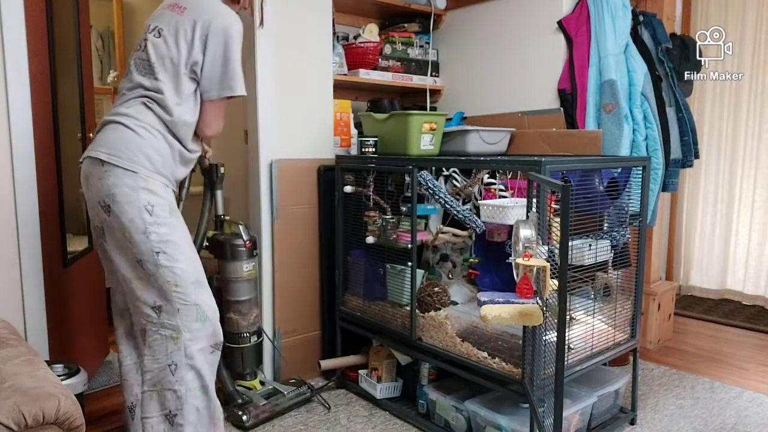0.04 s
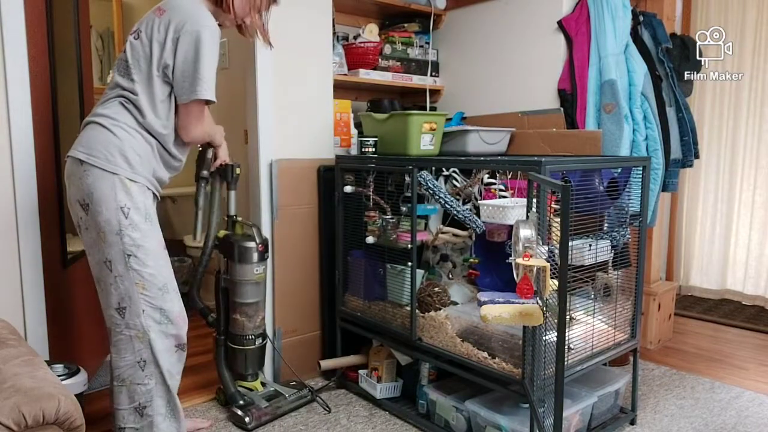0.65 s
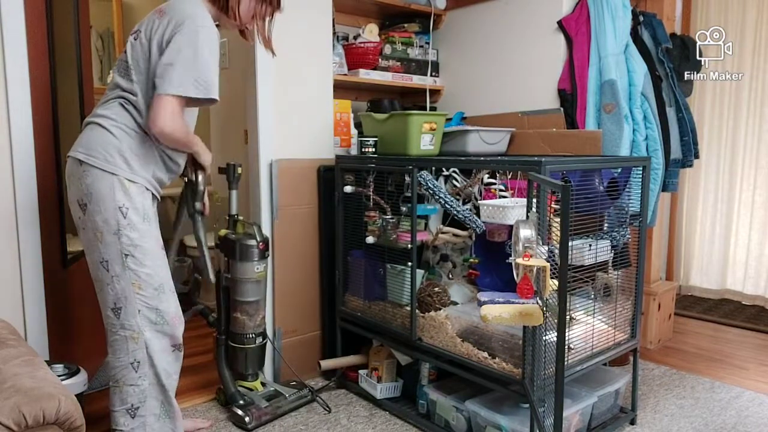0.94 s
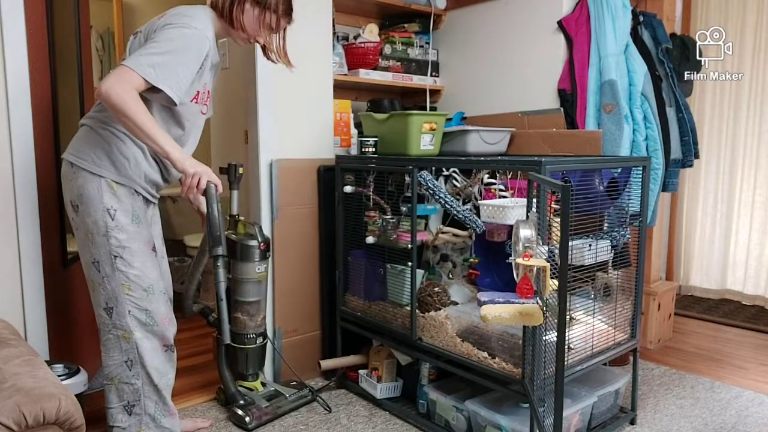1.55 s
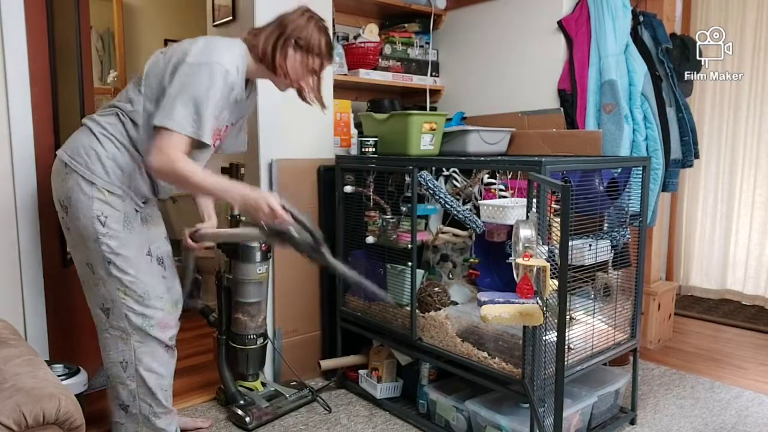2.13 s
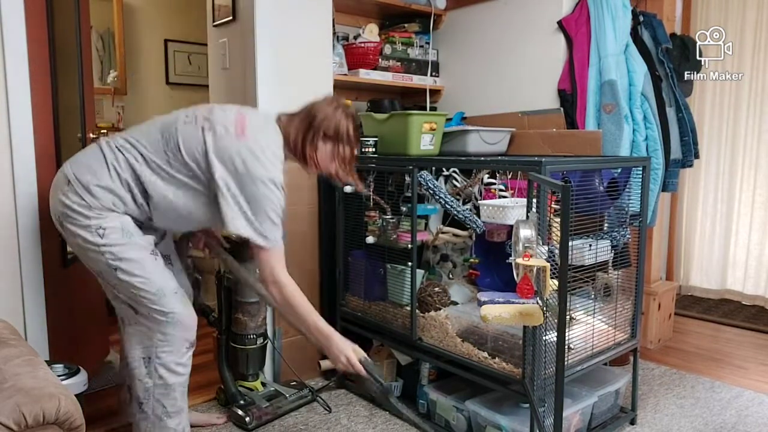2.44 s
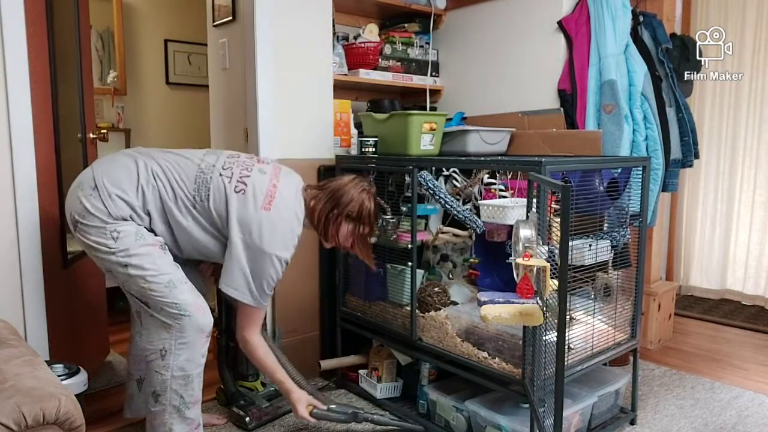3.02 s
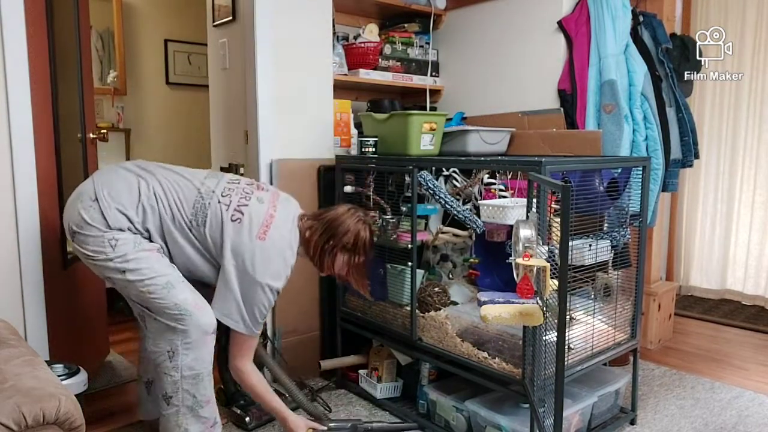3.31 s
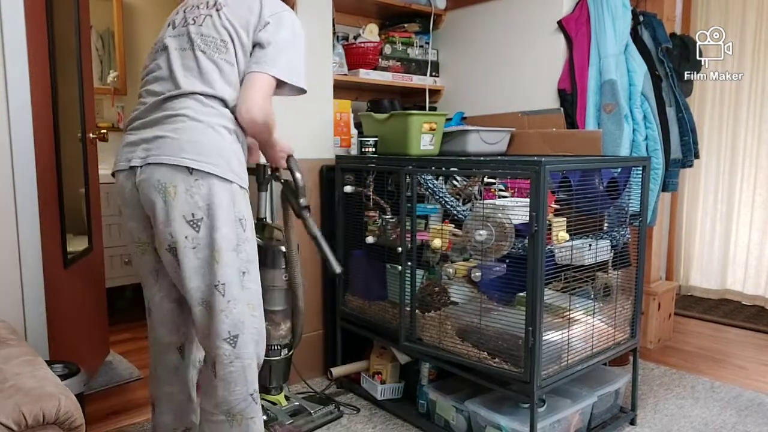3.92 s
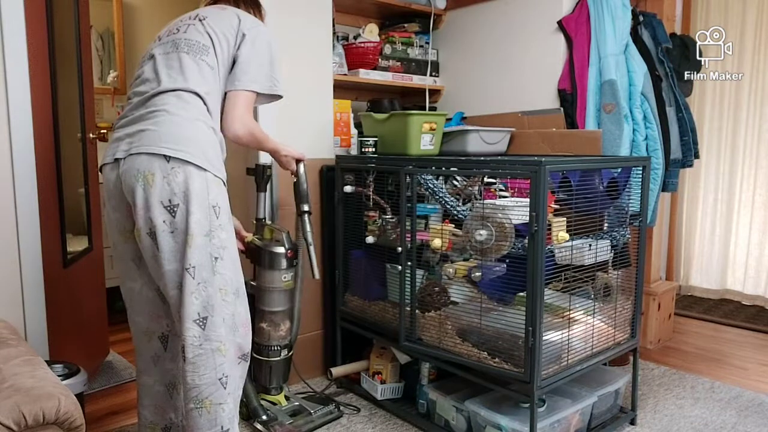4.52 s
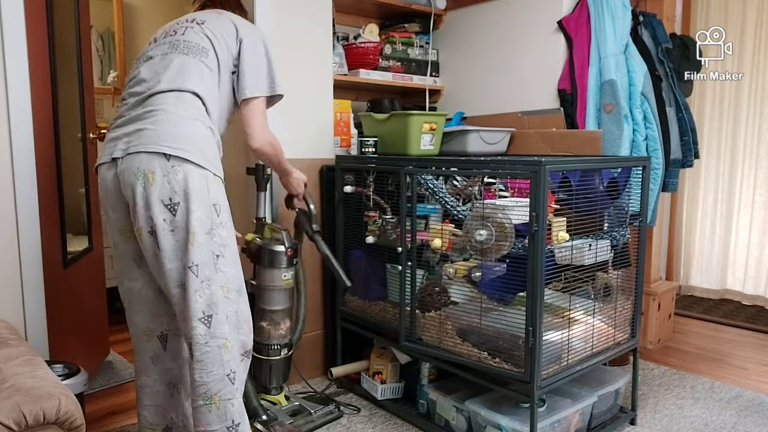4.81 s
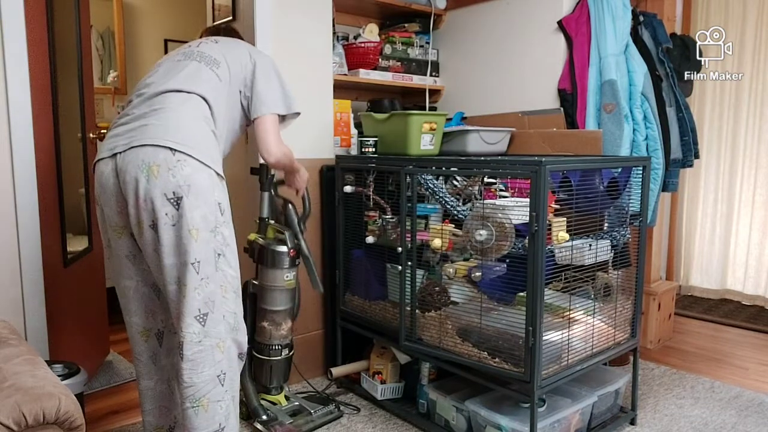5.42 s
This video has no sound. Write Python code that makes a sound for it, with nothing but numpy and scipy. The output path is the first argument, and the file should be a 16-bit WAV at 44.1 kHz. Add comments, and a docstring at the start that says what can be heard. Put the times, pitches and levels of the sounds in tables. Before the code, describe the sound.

After some light plastic clatter, an upright vacuum cleaner starts, runs briefly with a whine and rushing air, then coasts down indoors.

```python
"""A living room, where someone uses an upright vacuum cleaner. Its wand (the plastic tube) is pulled
from its clips with a few knocks, and the switch snaps. The motor squeaks, hums and spins up to a
loud whine while its fan drives rushing air. The nozzle works along the floor, then draws free air:
the motor speeds up a little and the hiss brightens. Near the end the power is cut, the whine sinks
as the motor coasts down, and a few soft bumps come through the floor."""
import sys
import numpy as np
from scipy import signal
from scipy.io import wavfile

SR = 44100
rng = np.random.default_rng(int(sys.argv[2]) if len(sys.argv) > 2 else 0)


def store_pcm(level_fs):
    """Save levels as 16-bit WAV."""
    pcm = np.round(np.clip(level_fs, -1, 1) * 32767).astype(np.int16)
    wavfile.write(sys.argv[1], SR, np.atleast_2d(pcm).T)


N = 245002
TIME = np.arange(N) / SR
POWER_ON_S, NOZZLE_FREE_S, POWER_OFF_S = 1.625, 3.72, 4.78
WORKING_HZ = 699   # motor turns per second with the nozzle on the floor


def from_db(db):
    """Turn decibels into a number to multiply a sound by."""
    return 10 ** (np.asarray(db) / 20)


def rms_one(x):
    """Scale a sound so that its average strength (rms) is 1."""
    return x / np.sqrt(np.mean(x ** 2) + 1e-20)


def at_hz(points, hz):
    """Read between the rows of a (frequency, value) table, giving each octave equal room."""
    frequencies, values = np.array(points).T
    return np.interp(np.log(hz), np.log(frequencies), values)


def after(s, ramp):
    """A smooth step from 0 to 1 at time s."""
    return .5 + .5 * np.tanh((TIME - s) / ramp)


def swell(s, spread):
    """A bell-shaped rise and fall around time s."""
    return np.exp(-((TIME - s) / spread) ** 2)


def panned(db):
    """Left and right gains that make the left louder by db and keep the total power."""
    gains = from_db(np.array([[.5], [-.5]]) * db)
    return gains / np.sqrt(np.mean(gains ** 2, axis=0))


def drift(rate):
    """A smooth random wobble of about size 1; a higher rate (Hz) makes it quicker."""
    step, warm_up = 40, 2000
    r = np.exp(-2 * np.pi * rate * step / SR)
    noise = rng.standard_normal(N // step + warm_up + 2)
    slow = signal.lfilter([1], [1, -2 * r, r * r], noise)[warm_up:]
    return np.interp(np.arange(N) / step, np.arange(len(slow)), rms_one(slow))


def resonate(x, hz, width):
    """Keep the part of a sound near hz; the narrower the width, the longer it rings."""
    r = np.exp(-np.pi * width / SR)
    feedback = [1, -2 * r * np.cos(2 * np.pi * hz / SR), r * r]
    return signal.lfilter(np.array([1, 0, -1]) * (1 - r * r) / 2, feedback, x + 1e-18)


def keep_side(x, hz, side):
    """A gentle filter that keeps the "low" or the "high" side of hz."""
    return signal.sosfilt(signal.butter(2, hz, side, fs=SR, output="sos"), x + 1e-18)


def wavering_tone(turns, waver, rate):
    """A tone whose echoes shift its level and phase at each ear as things move."""
    echo = np.array([1 + waver * (drift(rate) + 1j * drift(rate)) for ear in range(2)])
    return rms_one(np.real(echo * np.exp(2j * np.pi * turns)))


def strike(s, rise_s, fade_s):
    """A burst of tiny contacts that builds up, then dies away by 60 dB in fade_s."""
    age = np.maximum(TIME - s, 0)
    fade = from_db(-60 * np.maximum(age - rise_s, 0) / fade_s)
    return rng.standard_normal(N) * np.minimum(age / rise_s, 1) * fade


def room_echo(x, fade_s, echo_db):
    """The direct sound plus the room's fading wash of echoes, different at each ear."""
    t = TIME[:SR // 2]
    tail = keep_side(rng.standard_normal((2, len(t))), 7700, "low")
    tail *= from_db(-60 * t / fade_s) * (t > .003)
    tail /= np.sqrt(np.sum(tail ** 2, axis=1, keepdims=True))
    return x + from_db(echo_db) * signal.fftconvolve(np.atleast_2d(x), tail, axes=1)[:, :N]


def wall_echoes(x, longest_s, echo_db, count=12):
    """Nearby walls and furniture send a few quick echoes to each ear."""
    lags = rng.uniform(.0006, longest_s, (2, count))
    signs = rng.choice([-1, 1], (2, count))
    echoes = [sum(sign * np.roll(x[ear], int(lag * SR)) for lag, sign in zip(lags[ear], signs[ear]))
              for ear in range(2)]
    return x + from_db(echo_db) * np.array(echoes) / np.sqrt(count)


# How alike the noise is at the two ears: f/Hz, likeness (1 or more means the same)
EAR_LIKENESS = [(60, 0.5), (150, 0.6), (300, 1.05), (600, .5), (1200, 0.29), (3000, 0.1), (15000, 0.13)]
# Which way the noise leans: f/Hz, left minus right/dB
EAR_BALANCE = [(60, 1.3), (150, 2.6), (400, -.5), (1100, -1), (2400, .8), (4400, -.8), (8500, 4.2),
               (12000, .8)]
def noise_bands():
    """Stereo noise in third-octave slices, alike at both ears in the bass and unlike in the treble."""
    edges = 28 * 2 ** (np.arange(29) / 3)
    white = rng.standard_normal((2, 2, N))
    for k, (low, high) in enumerate(zip(edges, edges[1:])):
        band_filter = signal.butter(3, [low, high], "band", fs=SR, output="sos")
        shared, opposed = signal.sosfilt(band_filter, white[k % 2])
        hz = np.sqrt(low * high)
        alike = np.clip(at_hz(EAR_LIKENESS, hz), -1, 1)
        band = np.sqrt(1 + alike) * shared + np.sqrt(1 - alike) * opposed * [[1], [-1]]
        yield hz, band * panned(at_hz(EAR_BALANCE, hz))


# Tone colour of the quiet room: f/Hz, relative level/dB
ROOM_COLOUR = [(30, 1), (60, -5), (110, -7), (330, -4.5), (600, -19.5), (1800, -30), (3100, -34),
               (6500, -31.5), (11300, -26.5), (15500, -30)]
# Low drones: f/Hz, width/Hz, level/dB, loudest at t/s, spread/s
ROOM_DRONES = [(87.4, 52, -62.5, 0.045, 0.72), (163, 7.8, -72, 1.37, 0.53), (303.3, 23, -70.5, 0.45, 1.5)]
def room_tone():
    """Faint background noise with a few low drones that come and go."""
    out = from_db(-66) * rms_one(sum(from_db(at_hz(ROOM_COLOUR, hz)) * band for hz, band in noise_bands()))
    for hz, width, level_db, s, spread in ROOM_DRONES:
        noise = rng.standard_normal(N + SR)
        drone = resonate(resonate(noise, hz, width), hz, width)[SR:]
        out += from_db(level_db) * swell(s, spread) * rms_one(drone)
    return out


# Soft bumps on the floor: t/s, level/dB, f/Hz, length/s
FLOOR_BUMPS = [(2.703, -56, 60, 0.029), (5.07, -61, 58, .03), (5.412, -53.5, 202, .011),
               (5.436, -53, 125, .014), (5.447, -41.5, 65.6, .026)]
def floor_bumps():
    """Dull thuds come through the floor, sinking in pitch as they fade."""
    out = 0
    for s, level_db, hz, length in FLOOR_BUMPS:
        age = np.clip((TIME - s) / length, -6, 6)
        turns = hz * length * (age - .053 * age ** 2)
        out += from_db(level_db) * np.exp(-age ** 2 / 2) * wavering_tone(turns, waver=.04, rate=49)
    return out


# Knocks of wand, clips and switch, at relative levels: t/s, hollow/dB, clack/dB, crack/dB, fade/s
PLASTIC_KNOCKS = [(0.285, -69.5, -96, -87, 0.076), (0.421, -53.5, -54, -50, 0.11),
                  (0.429, -51, -64, -52, 0.077), (0.561, -53, -61, -57, 0.14),
                  (0.606, -51.5, -48, -67, 0.037), (0.647, -59.5, -55.5, -81, 0.055),
                  (0.751, -50, -43, -38, 0.042), (0.808, -65, -59, -56, 0.058),
                  (1.231, -64.5, -60, -44.5, 0.14), (1.26, -63, -53, -75, 0.073),
                  (1.523, -70, -68, -67, 0.14), (1.613, -55, -52.5, -42, 0.08),
                  (1.63, -47, -49, -36.5, 0.14), (1.837, -42, -44, -60, 0.063)]
# Short slides of wand and hose: t/s, relative level/dB, spread/s
WAND_SLIDES = [(0.01, -57.5, 0.022), (0.13, -69, 0.066), (0.385, -72, 0.027), (0.418, -57, 0.0047),
               (0.47, -73, .05), (0.6, -59, 0.02), (0.725, -54.5, 0.046), (0.81, -64, 0.1),
               (1.08, -74, 0.024), (1.28, -67, 0.054), (1.6, -68, 0.045)]
# Pitches at which the wand rings: f/Hz, width/Hz, gain/dB
WAND_RINGS = [(405, 147, 2), (824, 280, 4), (1180, 230, 5), (2176, 430, 1), (3930, 830, -3),
              (4600, 1600, -8)]
def wand_handling():
    """Knocks and scrapes make the tube ring, low (hollow) and high (clack), with a bright crack."""
    hollow, clack, crack = np.zeros((3, N))
    for s, hollow_db, clack_db, crack_db, fade_s in PLASTIC_KNOCKS:
        rattle = strike(s, rise_s=.0021, fade_s=fade_s)
        hollow += from_db(hollow_db + 13.5) * rattle
        clack += from_db(clack_db + 11.5) * rattle
        crack += from_db(crack_db - 2.5) * rattle
    strokes = sum(from_db(level_db) * swell(s, spread) for s, level_db, spread in WAND_SLIDES)
    scrape = strokes * from_db(4.3 * drift(44)) * rng.standard_normal(N)
    hollow += from_db(.5) * scrape
    clack += from_db(3) * scrape
    crack += from_db(-5) * scrape
    ring = sum((-1) ** k * from_db(db) * resonate(hollow if hz < 1800 else clack, hz, width)
               for k, (hz, width, db) in enumerate(WAND_RINGS))
    crack = keep_side(keep_side(crack, 8800, "high"), 12000, "low")
    return room_echo(ring + crack, fade_s=.14, echo_db=-1)


# Rings of the switch and squeaks of the brushes as the motor starts: t/s, relative level/dB, f/Hz, width/Hz,
# fade/s
SWITCH_AND_BRUSH_RINGS = [(1.633, -52, 12300, 700, 0.17), (1.644, -52, 2570, 300, 0.097),
                          (1.717, -56, 11380, 400, 0.11)]
def switch_and_brush_rings():
    """The switch rings as it snaps on, and the brushes, the motor's sliding contacts, chirp on the first turns."""
    out = 0
    for s, level_db, hz, width, fade_s in SWITCH_AND_BRUSH_RINGS:
        rub = strike(s, rise_s=.0018, fade_s=fade_s)
        band_gain = np.sqrt(SR / width)   # makes up for the narrow band
        out += from_db(level_db) * band_gain * resonate(resonate(rub, hz, width), hz, width)
    return room_echo(out, fade_s=.25, echo_db=4)


# Tones of the electric hum: f/Hz, relative level/dB
HUM_TONES = [(60, -76), (120, -51.5), (240, -55.5), (360, -52.5), (480, -70)]
def mains_hum(free):
    """The motor's coils hum unevenly while powered, hardest in the first surge of current."""
    powered = after(POWER_ON_S + .01, .022) - after(POWER_OFF_S, .02)
    surge = 1 - after(1.75, .03)
    hum = sum(from_db(db) * wavering_tone(hz * TIME, waver=.5, rate=6) for hz, db in HUM_TONES)
    return powered * from_db(6 * surge - 7 * free - 3.5) * hum * panned(2)


def motor_speed(free):
    """Turns per second: a kick from the current, a slower climb, then coasting against drag."""
    kick_share, kick_s, climb_s = .385, .074, .345
    running = np.maximum(TIME - POWER_ON_S, .005)
    shortfall = kick_share * np.exp(-running / kick_s) + (1 - kick_share) * np.exp(-running / climb_s)
    # as the nozzle comes free the speed jumps, then settles a little above the working speed
    jump_hz, settled_hz, settle_s = 14.5, 6, .42
    settling = np.exp(-np.maximum(TIME - NOZZLE_FREE_S, 0) / settle_s)
    hz = WORKING_HZ * (1 - shortfall) + free * (settled_hz + (jump_hz - settled_hz) * settling)
    coast_s, coast_power = 2.434, 1.561
    return hz / (1 + np.maximum(TIME - POWER_OFF_S, 0) / coast_s) ** coast_power


def driven_db(speed, free, floor_db, free_db, steepness):
    """A level that depends on where the nozzle is and grows as speed raised to the steepness."""
    return (1 - free) * floor_db + free * free_db + steepness * 20 * np.log10(speed / WORKING_HZ)


# Tone colour of the air, with the nozzle on the floor and with it free: f/Hz, relative level/dB
FLOOR_AIR_COLOUR = [(35, -17), (60, 0), (90, -19), (200, -2), (400, -3.5), (750, -2), (1050, -1.5),
                    (1700, 1.5), (3000, 0.5), (4100, 0), (5500, -1), (7800, -2.5), (10000, 0), (15500, -7)]
FREE_AIR_COLOUR = [(35, -18), (60, -1), (90, -15), (200, -1.5), (400, -1.5), (750, -3), (1050, 0),
                   (1700, -0.5), (3000, 1), (4100, 1), (5500, 0.5), (7800, -3), (10000, -1), (15500, -8)]
# Pitches at which the cleaner's casing rings: f/Hz, width/Hz, gain/dB
CASING_RINGS = [(1019, 88, 1.5), (3550, 160, -13.5), (4130, 590, -5), (8920, 330, -1.5), (9600, 300, -20),
                (10350, 460, -10.5), (12300, 960, -5.5)]
def rushing_air(speed, free):
    """Air swirls through ducts and nozzle: a low roar, a middle rush and a high hiss."""
    flow = np.interp(TIME - .04, TIME, speed)   # the air follows the motor a little late
    shudder_db = 9 * np.exp(-np.maximum(TIME - POWER_ON_S, 0) / .06)   # the casing shakes at the start
    roar_db = driven_db(speed, free, floor_db=2.7, free_db=-1.1, steepness=1) + shudder_db
    rush_db = driven_db(flow, free, floor_db=.46, free_db=-.23, steepness=1.7)
    hiss_db = driven_db(flow, free, floor_db=-.24, free_db=3.57, steepness=2.4)
    air = 0
    for hz, band in noise_bands():
        roar_share = at_hz([(300, 1), (1800, 0)], hz)
        hiss_share = at_hz([(4500, 0), (10000, 1)], hz)
        flow_db = roar_share * roar_db + hiss_share * hiss_db + (1 - roar_share - hiss_share) * rush_db
        colour_db = (1 - free) * at_hz(FLOOR_AIR_COLOUR, hz) + free * at_hz(FREE_AIR_COLOUR, hz)
        air += band * from_db(flow_db + colour_db + .71 * drift(14))
    air += sum(from_db(db) * resonate(air, hz, width) for hz, width, db in CASING_RINGS)
    # the open wand adds a fluttering, breathy pipe tone that flares as it swings
    pipe_db = -10.5 + 2 * drift(19) + 10 * swell(5.04, .028)
    air += free * from_db(pipe_db) * resonate(air, hz=4150, width=310)
    treble = keep_side(air, 2300, "high")
    air += wall_echoes(treble, longest_s=.008, echo_db=-8) - treble
    return from_db(-31.5) * after(POWER_ON_S + .005, .012) * air


# Pitches the room boosts (standing waves): f/Hz, half width/Hz, level/dB, left minus right/dB
ROOM_BOOSTS = [(346, 52, -33.5, -1), (482.6, 14.7, -36, 1), (533.2, 23.6, -23.5, 4),
               (571.7, 21.7, -24.5, -2.5), (615, 11, -27.5, 8), (637.6, 10.3, -29.5, -1),
               (654.3, 15.5, -29.5, -5), (685, 6.3, -34.5, -1.5), (709.6, 31, -34, -39)]
# The whine wavers as it runs down: t/s, change/dB, spread/s
RUN_DOWN_WAVERS = [(4.831, 11, 0.043), (5.0, -12.5, 0.19), (5.32, -11.5, 0.054)]
def whine_gain(speed):
    """Strength of the whine at each ear: it swells whenever its pitch meets one the room boosts."""
    power = from_db(-51) ** 2   # what remains between the boosts
    for hz, half_width, level_db, pan_db in ROOM_BOOSTS:
        closeness = np.exp(-((speed - hz) / half_width) ** 2)
        power += (from_db(level_db) * panned(pan_db) * closeness) ** 2
    waver_db = sum(change_db * swell(s, spread) for s, change_db, spread in RUN_DOWN_WAVERS)
    return np.sqrt(power) * from_db(waver_db)


# Higher tones that emerge near full speed: multiple of speed, on floor/dB, free/dB, steepness
WHINE_OVERTONES = [(2, -40.5, -56, 8.1), (3, -45, -50, 12), (4, -42, -67, 23)]
# Fan tones that swell as the load shifts: multiple of speed, level/dB, loudest at t/s, spread/s
FAN_SWELLS = [(2, -43, 5.23, 0.1), (3, -47.5, 5.2, 0.17), (2, -41.5, 4.96, 0.067), (3, -48, 2.48, 0.18),
              (3, -39.5, 3.15, 0.17), (4, -36, 2.816, 0.083), (4, -42.5, 3.25, 0.1), (5, -45, 3.2, 0.93),
              (6, -45.5, 3.03, 0.65), (7, -43.5, 2.54, 0.49), (7, -49.5, 4.5, 1), (9, -46, 3.1, 0.55)]
# Turning contacts and fan blades sing at the start: multiple of speed, level/dB, loudest at t/s
START_SQUEALS = [(7.9, -53, 1.75), (22.2, -57, 1.75), (35.5, -60, 1.785)]
def motor_whine(speed, free):
    """The motor sings one wave per turn; fan, bearing and a rough starting squeal add higher tones."""
    turns = np.cumsum(speed * (1 + .00038 * drift(21))) / SR
    ear_lead = np.array([[0], [1 / 8]])   # in turns; the right ear is nearer
    out = whine_gain(speed) * wavering_tone(turns + ear_lead, waver=.13, rate=6.7)
    for multiple, floor_db, free_db, steepness in WHINE_OVERTONES:
        gain = from_db(driven_db(speed, free, floor_db, free_db, steepness)) * panned(-7.1)
        out += gain * wavering_tone(multiple * turns + ear_lead, waver=.5, rate=2.5)
    for multiple, level_db, s, spread in FAN_SWELLS:
        fan = wavering_tone(multiple * turns, waver=.99, rate=9.7)
        out += from_db(level_db) * swell(s, spread) * fan
    bearing_whistle = wavering_tone(4.4 * turns, waver=.73, rate=7.5)
    out += after(2.9, .2) * from_db(-50 - 10 * free) * bearing_whistle
    for multiple, level_db, s in START_SQUEALS:
        squeal = wavering_tone(multiple * turns, waver=5.1, rate=11 * multiple)
        out += from_db(level_db) * swell(s, .18) * squeal
    return after(1.69, .023) * out


def scene():
    """Add up the cleaner, its handling and the room."""
    free = after(NOZZLE_FREE_S, .0037)   # 0 with the nozzle on the floor, 1 in free air
    speed = motor_speed(free)
    cleaner = motor_whine(speed, free) + mains_hum(free) + rushing_air(speed, free)
    dip = 1 - .85 * after(3.7155, .0005) * (1 - after(3.725, .006))   # the level dips briefly
    return dip * cleaner + switch_and_brush_rings() + wand_handling() + floor_bumps() + room_tone()


def record(dry):
    """The microphone sheds the deep bass; the highest treble is cut steeply."""
    treble_cut = signal.ellip(12, .1, 80, 15850, fs=SR, output="sos")
    return signal.sosfilt(treble_cut, keep_side(dry, 42, "high"))


dry = scene()
out = record(dry)
store_pcm(out)
```